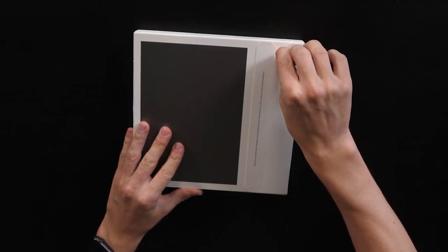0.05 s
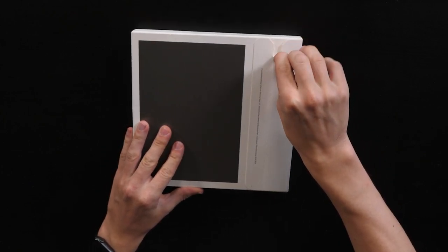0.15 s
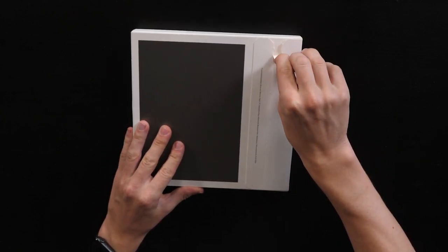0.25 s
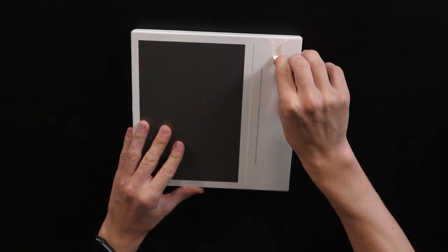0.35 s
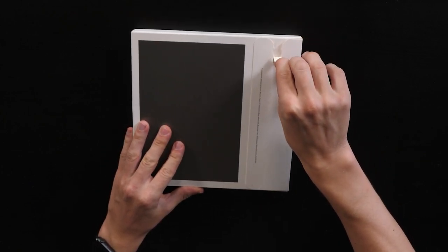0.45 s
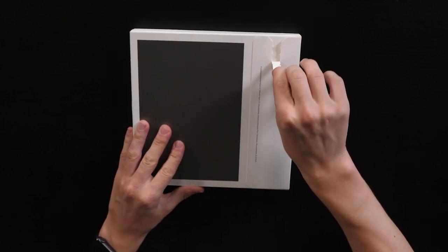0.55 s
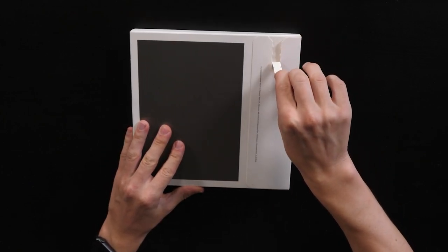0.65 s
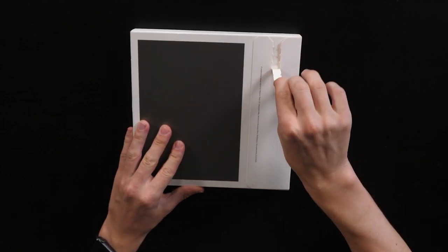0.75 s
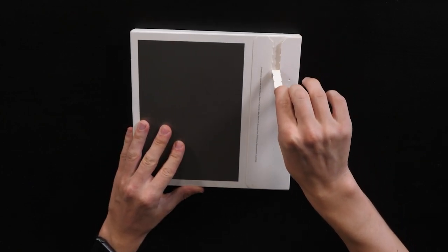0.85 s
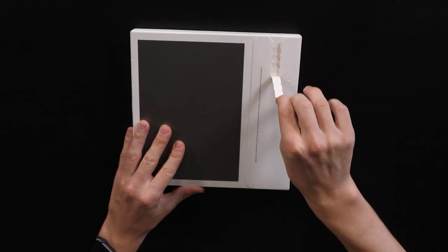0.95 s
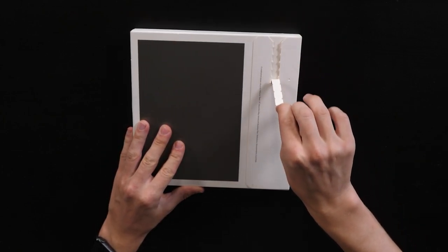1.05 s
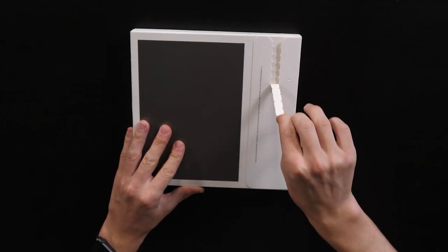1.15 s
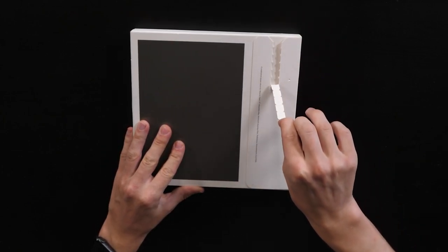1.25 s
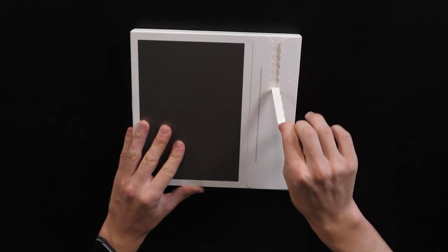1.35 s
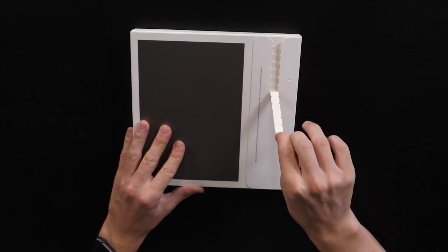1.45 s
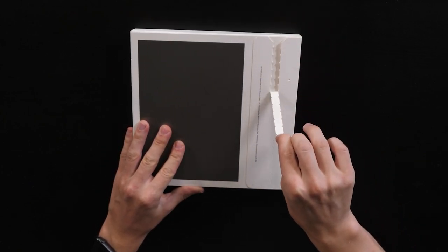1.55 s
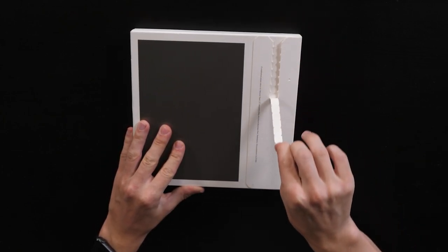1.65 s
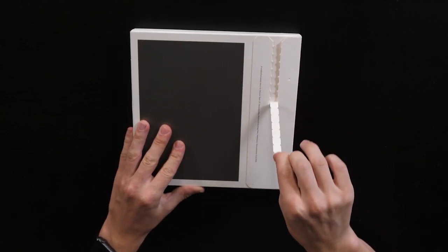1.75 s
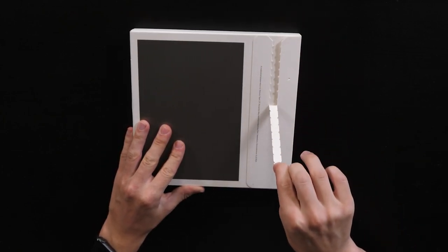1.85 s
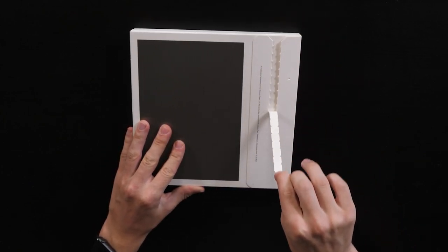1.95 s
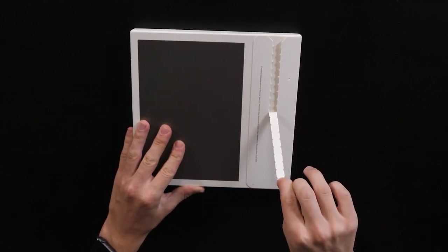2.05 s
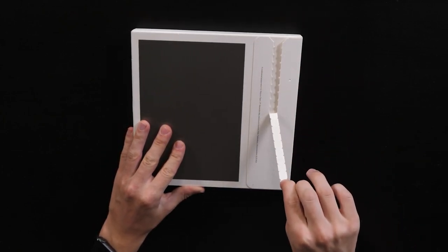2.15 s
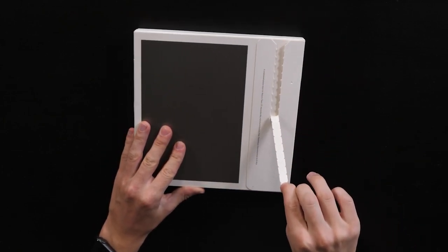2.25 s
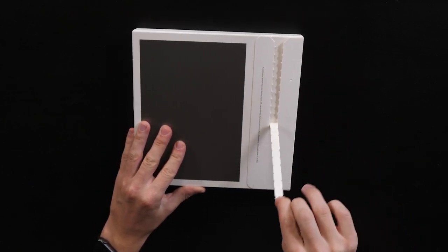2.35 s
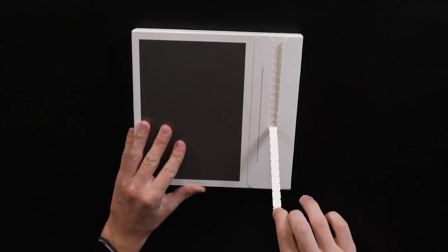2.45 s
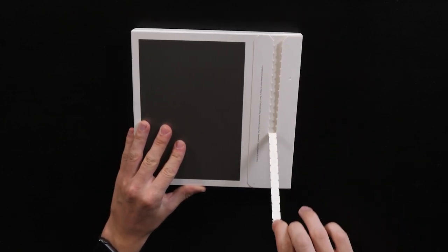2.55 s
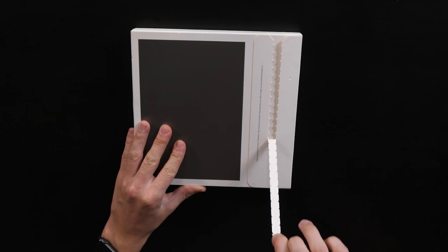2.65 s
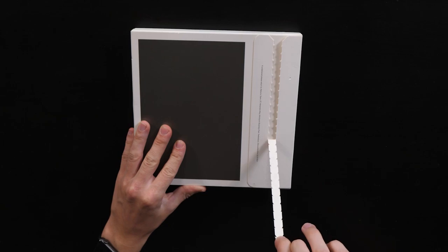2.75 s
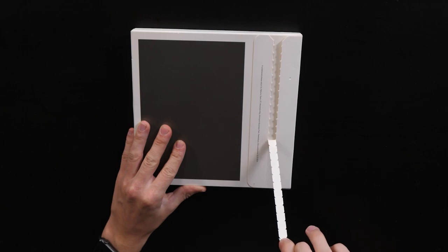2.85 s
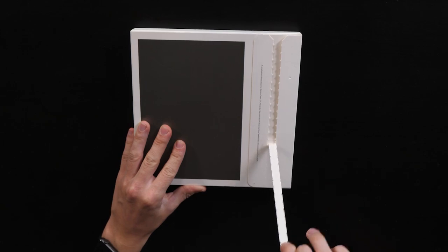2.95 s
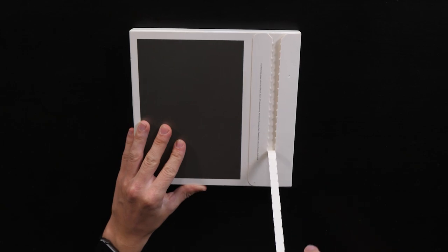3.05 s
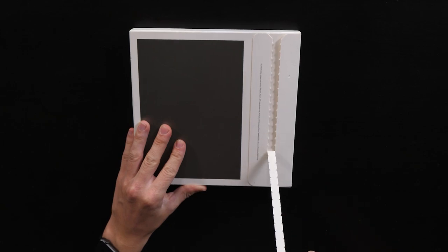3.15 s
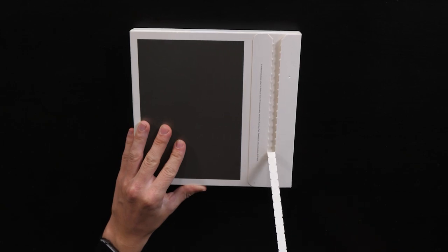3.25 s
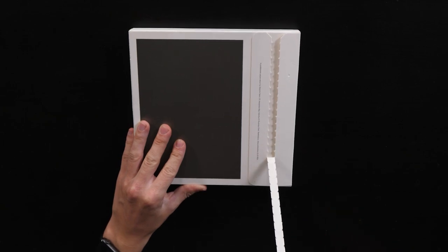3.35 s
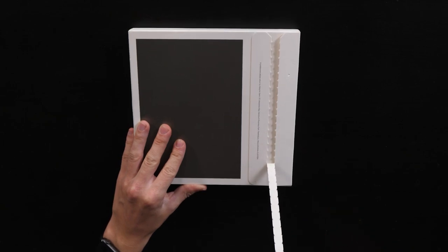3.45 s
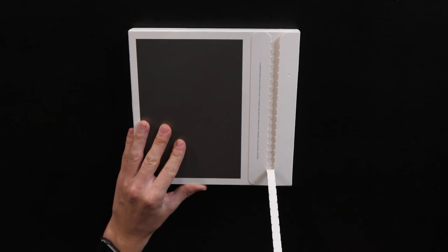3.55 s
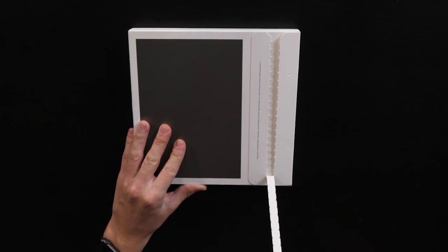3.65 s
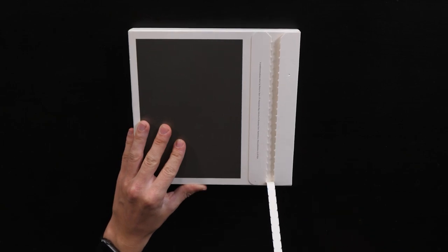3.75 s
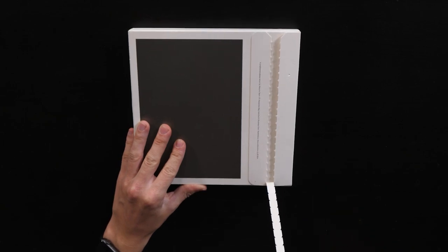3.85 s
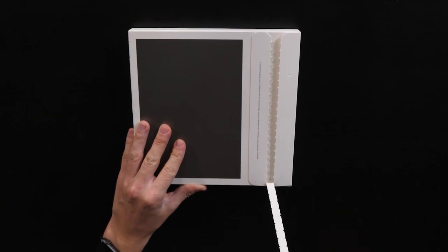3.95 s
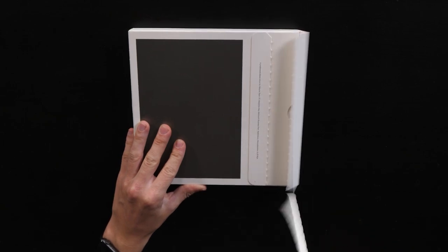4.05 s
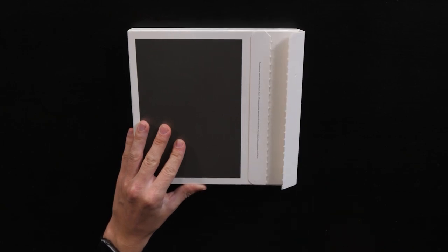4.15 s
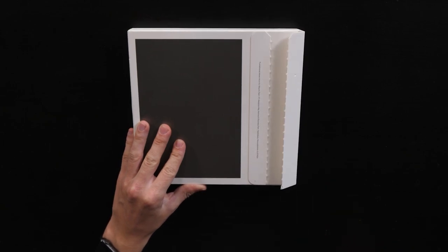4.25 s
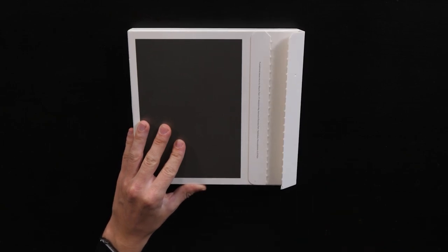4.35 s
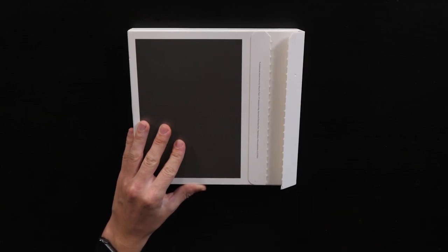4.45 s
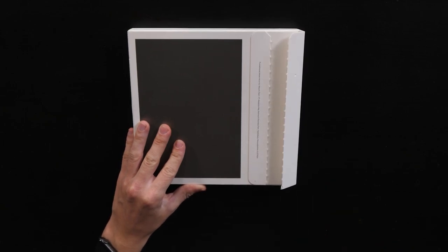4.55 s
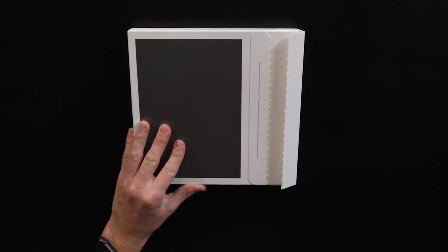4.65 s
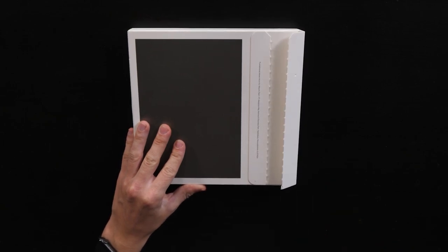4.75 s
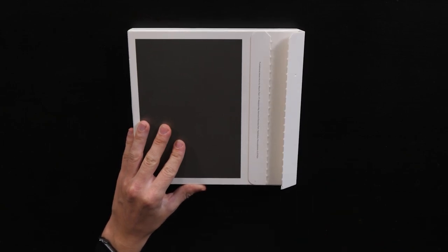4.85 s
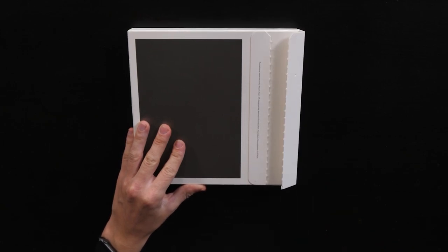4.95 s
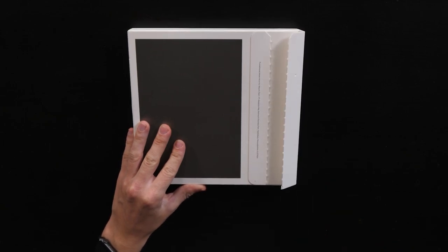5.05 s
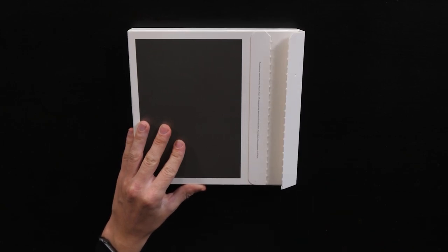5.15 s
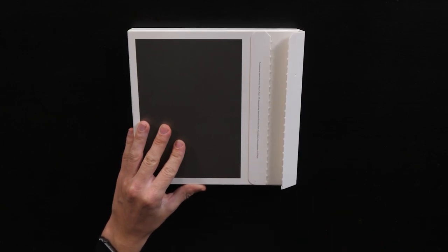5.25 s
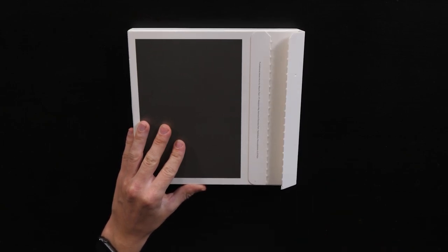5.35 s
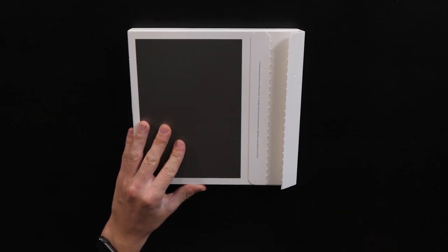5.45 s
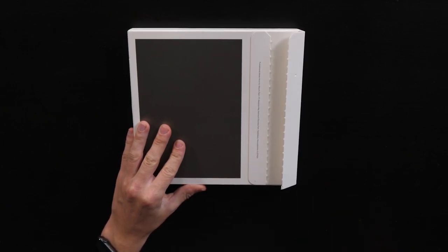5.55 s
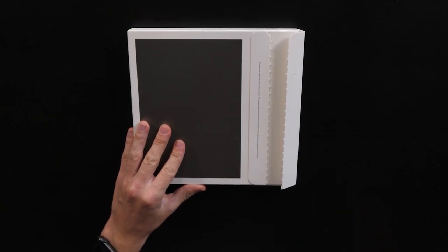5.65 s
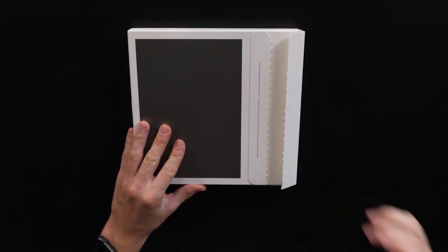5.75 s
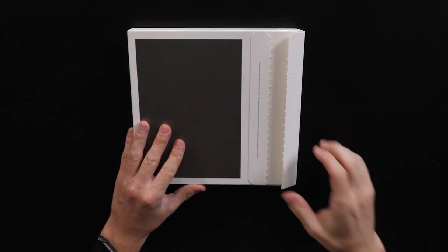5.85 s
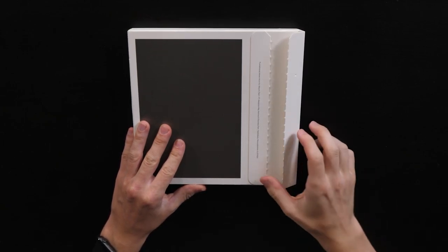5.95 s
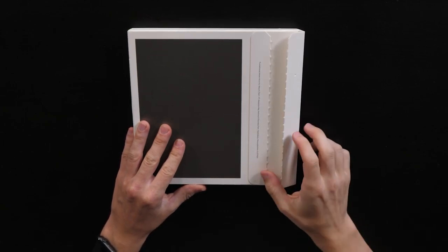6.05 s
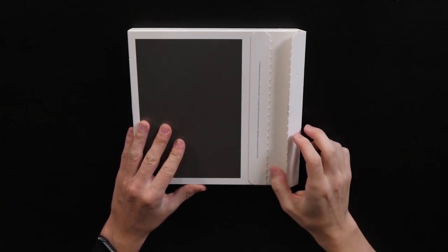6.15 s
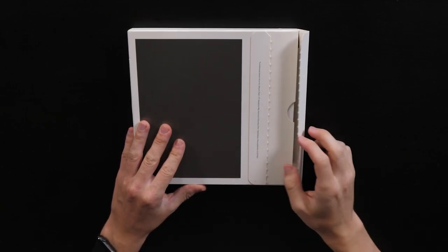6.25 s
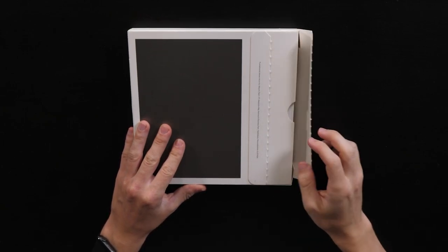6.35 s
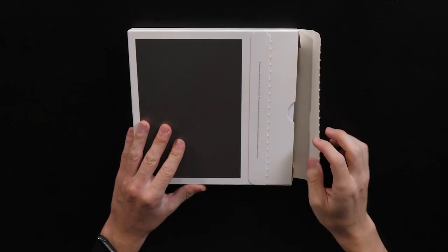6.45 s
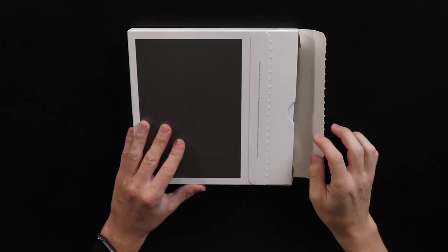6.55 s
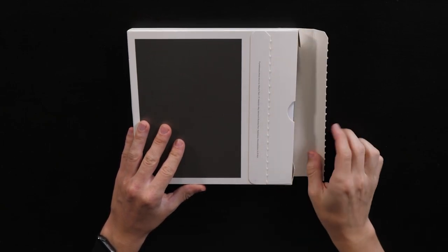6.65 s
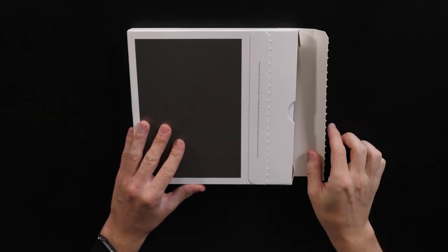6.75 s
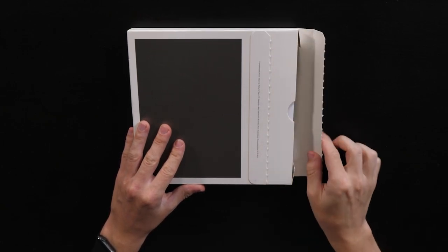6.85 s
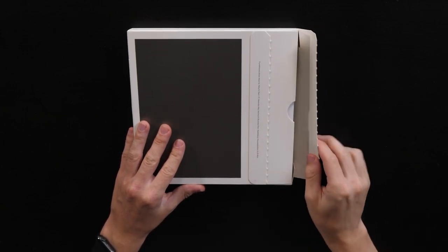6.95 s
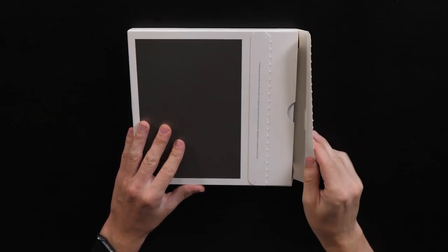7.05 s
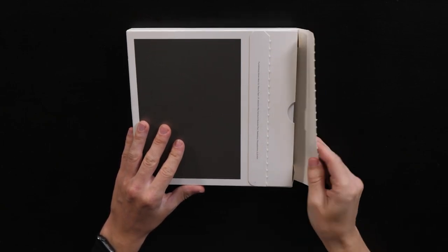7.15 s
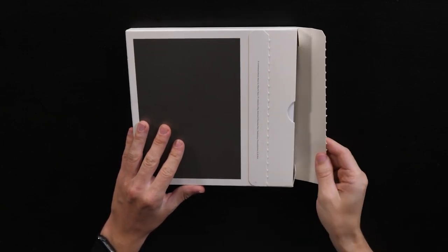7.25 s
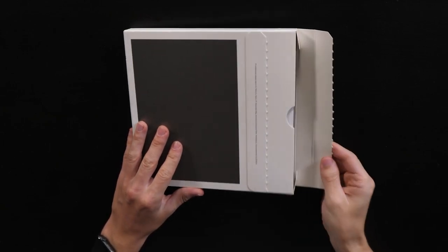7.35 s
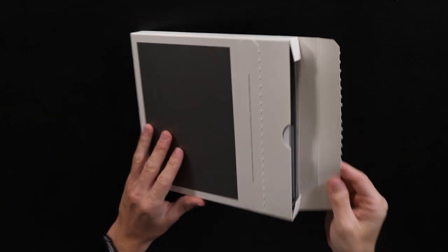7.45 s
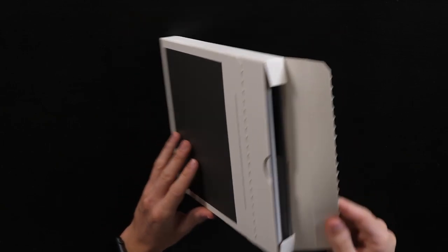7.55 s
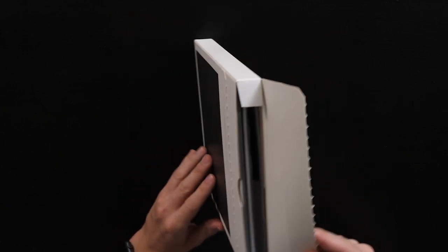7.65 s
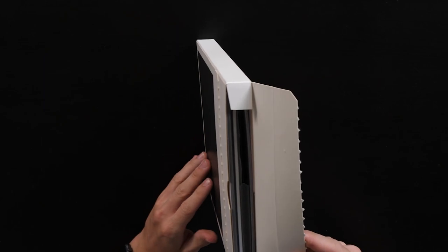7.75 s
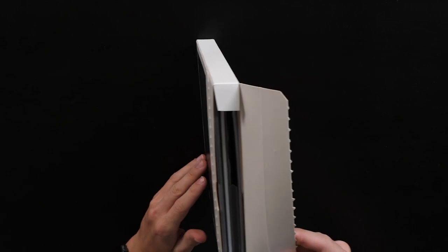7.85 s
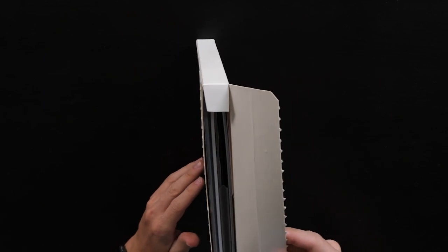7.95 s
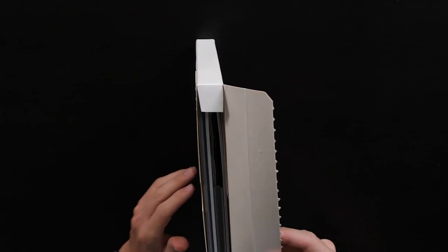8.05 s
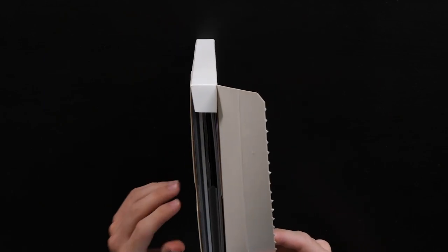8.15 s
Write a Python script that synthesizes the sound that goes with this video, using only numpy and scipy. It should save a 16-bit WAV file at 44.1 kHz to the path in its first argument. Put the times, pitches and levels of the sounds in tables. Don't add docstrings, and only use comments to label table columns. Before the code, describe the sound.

Close-up cardboard tear: dry sharp pops in irregular bursts for four seconds, near silence, then soft taps, rubbing and a brief box scuff.

```python
import sys
import numpy as np
from scipy import signal
from scipy.fft import rfft, irfft
from scipy.io import wavfile
from scipy.ndimage import uniform_filter1d

SR = 44100
rng = np.random.default_rng(int(sys.argv[2]) if len(sys.argv) > 2 else 0)


def wav_out(sig):
    wavfile.write(sys.argv[1], SR, np.round(np.clip(np.atleast_2d(sig).T, -1, 1) * 32767).astype(np.int16))


def invert_db(level):
    return 10 ** (np.asarray(level, dtype=float) / 20)


N = 362061

# (f/Hz, level/dB, undamped time to fall by 60 dB/s
BOX_MODES = [(134.6, -4, 0.36), (305.1, -8.5, 0.2), (446, -9, 0.16), (582.5, -8, 0.064), (883, -3.5, 0.051),
             (1250, -13.5, 0.19), (1350, -15, 0.52)]
# (f/Hz, level/dB)
FIBRE_COLOUR = [(2650, -6), (4500, -3), (5620, 1.5), (8230, 1), (10200, -2.5), (12200, 1.5), (15700, -5),
                (16800, -16.5)]


def unit(x):
    return x / np.sqrt(np.mean(x ** 2))


def along(curve, hz):
    f, value = np.array(curve).T
    return np.interp(np.log(hz), np.log(f), value)


def colour(x, curve):
    size = 4096
    hz = np.arange(1, size // 2 + 2) * SR / size
    cepstrum = irfft(np.log(invert_db(along(curve, hz))))
    cepstrum[1:size // 2] *= 2
    cepstrum[size // 2 + 1:] = 0
    response = irfft(np.exp(rfft(cepstrum)))
    return signal.fftconvolve(x, response / np.linalg.norm(response))[:N]


def ring(x, hz, width_hz):
    b, a = signal.iirpeak(hz, hz / width_hz, SR)
    return signal.lfilter(b, a, x)


def dull(x, hz):
    return signal.sosfilt(signal.butter(4, hz, fs=SR, output="sos"), x)


def walk(rate):
    k = int(SR / rate)
    steps = np.repeat(rng.standard_normal(N // k + 1), k)
    return 0.91 * uniform_filter1d(uniform_filter1d(steps, k), k)[:N]


def grains(rate, spread_db):
    chance = rng.random((3, N))
    happens = chance[0] < rate / SR
    sign = np.sign(chance[1] - 0.5)
    size_db = np.minimum(-spread_db * np.log(chance[2] + 1e-9), 17)
    return unit(happens * sign * invert_db(size_db))


def patchy(x, spread_db, rate):
    centres = 500 * 2 ** np.arange(0, 5, 1 / 3)
    return unit(sum(ring(x * invert_db(spread_db * walk(rate)), hz, hz / 5) for hz in centres))


def strokes(rows, rise_db_s, fall_db_s):
    t = np.arange(0, N + 64, 64) / SR
    start, hold, *columns = np.transpose(rows)[:, :, None]
    rise_db = -rise_db_s * np.maximum(start - t, 0)
    fall_db = -fall_db_s * np.maximum(t - start - hold, 0)
    gains = []
    for db in columns:
        gain = np.sqrt(np.sum(invert_db(db + rise_db + fall_db) ** 2, axis=0))
        gains.append(np.interp(np.arange(N) / SR, t, gain))
    return gains


def air():
    # (f/Hz, level/dB)
    air_colour = [(12, -40), (20, -9), (71, 3.5), (224, -5), (265, -6), (382, -16.5), (709, -18.5),
                  (863, -14), (1240, -19), (1740, -28), (2510, -32.5), (3720, -29.5), (5210, -37),
                  (14700, -38), (16500, -41.5)]
    noise = colour(rng.standard_normal(N), air_colour)
    return invert_db(-55) * noise * invert_db(0.98 * walk(9.2))


def box(push):
    push = np.broadcast_to(push, (len(BOX_MODES), N))
    out = np.zeros(N)
    for k, (hz, db, t60) in enumerate(BOX_MODES):
        out += (-1) ** k * invert_db(db) * ring(push[k], hz, 2.2 / (0.4 * t60))
    return out


def snaps(events, crack_ms, ring_ms, width_hz, push_ms, bright_db, slap):
    crack, flap = np.zeros((2, N + 2048))
    push = np.zeros((len(BOX_MODES), N + 2048))
    lead, length = 768, 2048
    t = (np.arange(length) - lead) / SR * 1000
    before, after = np.minimum(t, 0), np.maximum(t, 0)
    swell = np.exp(before / 0.55) + 0.064 * np.exp(before / 3) * (t < 0)
    fray = swell + 0.14 * np.exp(before / 2.6) * (t < 0)
    crack_fall = np.exp(-after / crack_ms) + 0.0334 * np.exp(-after / 4)
    shove = np.exp(-((t - push_ms) / push_ms) ** 2) / push_ms
    for s, db, crack_db, thump_db, hz in events:
        noise = rng.standard_normal((3, length))
        first = int(s * SR) - lead
        span = slice(first, first + length)

        rush = noise[0] * fray * crack_fall
        crack[span] += invert_db(crack_db) * rush / np.abs(rush).max()

        burst = noise[1] * swell * np.exp(-after / ring_ms)
        tone = ring(burst, hz, width_hz) + 1.8 * ring(burst, hz, width_hz / 2.2)
        tone += 0.6 * ring(burst, 3600 + 300 * noise[2, -1], 480)
        tone += slap * ring(burst, 2000, 4500)
        flap[span] += invert_db(db) * tone / np.abs(tone).max()

        place_db = 3 * noise[2, :len(BOX_MODES), None]
        place_db[0] += -2 * (s < 2.8)
        place_db[0] += 0.5 * (s > 5.0)
        push[:, span] += invert_db(thump_db + place_db) * shove
    cracks = invert_db(bright_db) * colour(crack[:N], FIBRE_COLOUR)
    return cracks + invert_db(4.5) * dull(flap[:N], 4700) + invert_db(15.5) * box(push[:, :N])


def tearing():
    # (t/s, flap level/dB, crack level/dB, box thump/dB, flap ring f/Hz)
    bridges = [(0.1047, -26.5, -30, -42.5, 1700), (0.1831, -13, -28, -24, 2200),
               (0.5584, -26.5, -8.5, -34, 2400), (0.726, -66, -40, -36, 900), (0.7946, -22, -27, -37, 4430),
               (0.9157, -28.5, -33, -36.5, 1530), (1.0858, -29, -30, -37, 2330),
               (1.1318, -20.5, -20, -36, 2110), (1.4343, -21, -14.5, -31, 1150),
               (1.6916, -26.5, -28, -33, 870), (1.8163, -22, -22, -25, 2190),
               (1.9877, -25.5, -26, -36, 2300), (2.3529, -18.5, -16.5, -28, 2100),
               (2.434, -14.5, -19.5, -26, 2070), (2.554, -23, -24, -27, 2280),
               (2.674, -12, -19, -29.5, 1890), (3.033, -10.5, -17, -30, 1840),
               (3.1092, -18.5, -11.5, -29, 2670), (3.3937, -12.5, -16, -24, 2160),
               (3.4736, -13.5, -10, -25, 1890), (3.5813, -15, -14.5, -33.5, 1480),
               (3.6867, -16, -16, -31.5, 2020), (3.7943, -33, -11.5, -29.5, 2540),
               (4.1046, -12, -18.5, -23, 2600)]
    # (t/s, flap level/dB, crack level/dB, flap ring f/Hz)
    other_edge = [(0.1835, -32, -21, 3250), (0.5681, -28.5, -42, 1450), (0.7305, -22.5, -25.5, 2380),
                  (0.7994, -22, -16.5, 2920), (0.9, -30.5, -31, 2150), (0.9204, -27, -27, 1630),
                  (0.984, -27, -24, 880), (0.9887, -20, -26, 700), (1.0896, -27.5, -26.5, 2260),
                  (1.6832, -27, -25, 2193), (1.7035, -29.5, -19.5, 1860), (1.7089, -15, -11, 1740),
                  (1.829, -17.5, -17, 1510), (1.8331, -17, -22, 1500), (1.9741, -23.5, -24, 2530),
                  (2.3573, -14.5, -27, 1375), (2.4442, -15, -19.5, 1510), (2.557, -16, -16.5, 2010),
                  (2.67, -22, -25, 1870), (3.025, -26.5, -28, 1925), (3.0295, -23.5, -30, 1860),
                  (3.1012, -23.5, -22.5, 1990), (3.107, -13.5, -24, 2500), (3.4766, -13.5, -31.5, 1853),
                  (3.5758, -33, -22, 3177), (3.7843, -26, -17, 2720), (3.7897, -19.5, -24, 3200),
                  (4.0664, -30, -33, 2980), (4.0855, -31, -48, 2760), (4.096, -30.5, -34, 3600),
                  (4.149, -16, -40, 1250), (4.1495, -26.5, -27, 3860)]
    # (t/s, crack level/dB, flap ring f/Hz)
    bundles = [(0.0975, -31, 2170), (0.2336, -40, 3010), (0.25, -36, 1980), (0.4342, -38, 1810),
               (0.438, -36, 2780), (0.4474, -36, 930), (0.4711, -30, 955), (0.5443, -29, 2040),
               (0.6562, -32.5, 2580), (0.6723, -36.5, 2610), (0.7424, -37, 1890), (0.8482, -37, 3800),
               (0.9103, -29, 1520), (1.0662, -39.5, 2430), (1.2272, -38.5, 3810), (1.2711, -38, 3400),
               (1.2798, -31.5, 2000), (1.2827, -32, 2820), (1.2955, -29, 2200), (1.3623, -42, 3660),
               (1.405, -41.5, 1270), (1.4437, -53, 1110), (1.9597, -31.5, 2350), (1.9638, -29, 2630),
               (2.4124, -39, 3550), (2.7677, -40.5, 1900), (3.0417, -39.5, 900), (3.1183, -35, 3340),
               (3.5592, -37, 900), (3.5673, -34.5, 1010)]
    # (t/s, crack level/dB)
    strays = [(0.0537, -52), (0.2843, -47), (0.5547, -37), (1.2537, -47), (1.636, -51), (2.0812, -43.5),
              (2.0909, -40), (2.2104, -54), (2.225, -44.5), (2.905, -43), (3.0057, -44), (3.3073, -44.5),
              (3.998, -51)]
    # (t/s, crack level/dB)
    fine_hairs = [(0.087, -57), (.146, -53), (.167, -50), (.33, -59), (0.363, -52), (.367, -56),
                  (.395, -52), (.407, -64), (.4245, -60), (.455, -49), (.628, -46), (.68, -36), (.689, -46),
                  (.697, -44), (.711, -48), (.78, -40), (0.8677, -40), (.9537, -38), (1.233, -43),
                  (1.312, -41), (1.4965, -44), (1.665, -48), (1.899, -47), (1.924, -38), (2.029, -51),
                  (2.1605, -54), (2.3436, -51), (2.513, -44), (2.624, -40), (2.6494, -44), (2.66, -33),
                  (2.7357, -48), (2.871, -60.5), (2.97, -52), (3.208, -51), (3.274, -58.5), (3.3315, -43),
                  (3.3717, -44), (3.441, -48), (3.746, -54), (4.011, -49.5), (4.029, -52.5), (4.055, -40),
                  (2.333, -53), (2.753, -46), (2.992, -49.5), (.613, -45.5), (.815, -42), (0.886, -44.5),
                  (1.055, -45), (1.18, -48.5), (1.214, -45.5), (1.54, -48), (1.649, -51.5)]
    events = [*bridges]
    events += [(s, db, crack_db, db - 21.5, hz) for s, db, crack_db, hz in other_edge]
    fibres = [*bundles] + [(s, db, 2200) for s, db in strays]
    events += [(s, db - 5.5, db, db - 13, hz) for s, db, hz in fibres]
    events += [(s, db - 12, db, db - 25, 3600) for s, db in fine_hairs]
    return snaps(events, crack_ms=0.38, ring_ms=2.1, width_hz=510, push_ms=0.47, bright_db=3.4, slap=0.61)


def peeling():
    # (start t/s, hold/s, level/dB, fine fibre level/dB)
    tugs = [(.1, 0.025, -55, -63.5), (.185, 0.027, -42, -52), (.435, 0.02, -51, -57.5),
            (.55, 0.06, -44, -52), (.74, 0.098, -47, -57), (.84, 0.17, -48, -53), (1.08, 0.079, -47, -56.5),
            (1.25, 0.032, -47, -51), (1.41, 0.021, -52, -55), (1.45, 0.062, -51, -56),
            (1.69, 0.14, -45.5, -52.5), (1.86, 0.046, -45.5, -57.5), (1.94, 0.059, -43.5, -54),
            (2.1, 0.16, -64.5, -72), (2.25, 0.068, -53, -77), (2.37, 0.11, -46.5, -56),
            (2.5, 0.11, -47.5, -57.5), (2.645, 0.066, -41, -54.5), (2.87, 0.18, -64, -73),
            (3.05, 0.09, -40.5, -52), (3.2, 0.21, -58.5, -68), (3.41, 0.11, -42, -52),
            (3.53, 0.3, -46, -54.5), (4.09, 0.012, -39, -41)]
    # (f/Hz, level/dB)
    strip_colour = [(290, -35), (500, -18), (566, -0.5), (758, -8), (1050, -3), (3350, -6), (3760, -4.5),
                    (6000, -21.5), (7800, -26.5), (13200, -120)]
    body, fine = strokes(tugs, rise_db_s=603.5, fall_db_s=184)
    flurry = walk(70)
    patter = invert_db(3.0 * flurry) * (grains(2000, 1.7) + 0.32 * rng.standard_normal(N))
    tick_gain = invert_db(3.3 * flurry + 5.3 * walk(250))
    ticks = tick_gain * (grains(1200, 3) + 0.28 * rng.standard_normal(N))
    layers = colour(patchy(patter, 4.1, 25), strip_colour)
    dust = colour(patchy(ticks, 5.5, 40), FIBRE_COLOUR)
    return invert_db(-5.5) * body * layers + invert_db(-2.0) * fine * dust


def shudders():
    # (t/s, level/dB, f/Hz, time to fall by 60 dB/s)
    shudder_events = [(.186, -40, 600, 0.17), (0.803, -41, 4000, .12), (.99, -44.5, 2100, .15),
                      (1.133, -45, 1850, 0.25), (1.437, -39, 1050, 0.18), (1.69, -40.5, 693, .1),
                      (1.722, -40.5, 1700, .25), (1.834, -38, 735, 0.086), (2.36, -38.5, 1490, 0.13),
                      (2.446, -40, 1800, 0.26), (2.56, -43.5, 600, 0.068), (2.675, -38, 1860, 0.074),
                      (2.679, -45, 3900, 0.1), (3.035, -41.5, 1940, .12), (3.396, -38, 640, 0.061),
                      (3.478, -36, 850, 0.098), (3.585, -43.5, 710, 0.083), (4.107, -34, 960, 0.13),
                      (4.152, -35.5, 970, 0.22)]
    sharpness = 4.1
    out = np.zeros(N)
    t = np.arange(SR // 4) / SR
    for s, db, hz, t60 in shudder_events:
        envelope = np.exp(-np.log(1000) * t / t60) * (1 - np.exp(-t / 0.002))
        rough = rng.standard_normal(len(t)) * envelope
        band = ring(ring(rough, hz, hz / sharpness), hz, 2 * hz / sharpness)
        first = int(s * SR)
        out[first:first + len(t)] += 2.3 * invert_db(db) * band / np.abs(band).max()
    return out


def table():
    # (t/s, level/dB)
    jolts = [
        (0.19, -29),
        (.25, -35),
        (0.567, -32),
        (.81, -41),
        (2.359, -49.5),
        (4.11, -37),
        (4.149, -28),
        (7.548, -45),
        (7.68, -40),
        (7.858, -46),
    ]
    push = np.zeros(N)
    for s, db in jolts:
        push[int(s * SR)] = invert_db(db)
    return invert_db(56) * ring(ring(push, 48, 14.0), 81, 37)


def lid():
    # (t/s, peak level/dB)
    booms = [
        (1.435, -42),
        (1.713, -42.5),
        (2.359, -40.5),
        (2.448, -38),
        (2.559, -39),
        (3.687, -38),
        (6.84, -42),
    ]
    push = np.zeros(N)
    for s, db in booms:
        push[int(s * SR)] = invert_db(db)
    return invert_db(54.5) * ring(ring(push, 116.4, 22), 116.4, 90)


def freed_flap():
    # (f/Hz, level/dB)
    freed_colour = [(290, -25.5), (500, -13.5), (859, -18.5), (1020, 2), (1210, -10.5), (1580, -4.5),
                    (2500, -28.5), (3300, -13.5), (4500, -13), (5490, -42), (7000, -37), (9100, -48),
                    (15400, -120)]
    freed_s, t60_s = 4.152, 0.2
    t = np.arange(N) / SR - freed_s
    fall = np.log(1000) * np.maximum(t, 0) / t60_s
    flutter = invert_db(-25) * np.exp(-fall / 7.4)
    shudder = np.exp(np.minimum(t, 0) / 0.022) * (np.exp(-fall) + flutter)
    rough = shudder * invert_db(3.5 * walk(60)) * rng.standard_normal(N)
    return invert_db(-32) * colour(rough, freed_colour)


def rubbing():
    # (start t/s, hold/s, level/dB, hiss level/dB, pressure on the box/dB)
    rubs = [(4.58, 1.4, -91.5, -97.5, -73.5), (4.61, 0.023, -71.5, -80, -74),
            (4.78, 0.048, -65, -79.5, -80.5), (4.88, 0.033, -78.5, -78, -78),
            (5.35, 0.066, -64.5, -80.5, -86), (5.997, 0.013, -46.5, -70, -46),
            (6.03, 0.15, -56, -72.5, -50.5), (6.25, 0.93, -60, -72.5, -61.5), (6.45, 0.13, -59, -70, -61),
            (6.675, .012, -60, -69, -51), (6.69, 0.03, -47, -60.5, -50.5), (6.755, .015, -50.5, -78, -50),
            (6.81, 0.05, -48.5, -81, -48), (6.938, 0.0098, -50, -59, -53), (6.952, 0.021, -42, -64, -46),
            (6.985, 0.027, -48, -67, -62), (7.02, 0.089, -51.5, -69, -52), (7.14, 0.055, -47.5, -62, -50.5),
            (7.21, 0.039, -47, -58.5, -48), (7.35, 0.12, -58, -80, -58), (7.275, .01, -61, -65, -48),
            (7.292, 0.0054, -45.5, -71, -56), (7.458, .025, -49, -67, -57), (7.49, 0.11, -42, -53.5, -49.5),
            (7.595, 0.061, -36.5, -51.5, -48), (7.655, 0.037, -33.5, -47, -37.5),
            (7.7, 0.044, -37, -46, -42.5), (7.79, 0.091, -61, -76, -63), (7.9, 0.22, -65.5, -84, -65)]
    # (start t/s, hold/s, share/dB)
    squeals = [
        (6.0, 0.98, -26),
        (6.94, 0.033, 1),
    ]
    # (start t/s, hold/s, level/dB)
    drags = [
        (7.46, .1, -63),
        (7.58, 0.048, -48),
        (7.635, 0.063, -40.5),
        (7.715, .025, -50),
    ]
    # (f/Hz, width/Hz, level/dB)
    flap_tones = [(1174, 30, 4), (1700, 73, -2), (2200, 490, -13), (3210, 100, 3)]
    # (f/Hz, level/dB)
    finger_colour = [(470, -32), (800, -3.5), (1090, 5.5), (1310, 1.5), (1670, 0), (2000, -6), (3270, -4),
                     (7000, -34), (9100, -53), (15400, -120)]
    # (f/Hz, level/dB)
    slide_colour = [(470, -18.5), (800, -2.5), (945, -39), (1060, 2.5), (1690, -1), (2980, -2), (3490, 0),
                    (4120, -5), (4870, -19), (6500, -25), (8450, -33), (14300, -120)]
    rates = dict(rise_db_s=650, fall_db_s=398)
    body, hiss, pressure = strokes(rubs, **rates)
    (squeal,) = strokes(squeals, **rates)
    (edge,) = strokes(drags, **rates)

    sliding = np.arange(N) / SR > 7.42
    unevenness = invert_db(np.where(sliding, 2.1, 3.3) * walk(50))
    slip = unevenness * (grains(4500, 2.7) + 0.47 * rng.standard_normal(N))

    flap = sum(invert_db(db) * ring(slip * invert_db(2.0 * walk(11)), hz, width) for hz, width, db in flap_tones)
    by_finger = invert_db(-1.5) * colour(patchy(slip, 3.6, 35), finger_colour)
    panel = np.where(sliding, unit(colour(slip, slide_colour)), by_finger)
    panel = panel + squeal * unit(dull(flap, 3560))

    whistle = edge * unit(ring(ring(slip, 4020, 790), 4020, 1580))
    rumble = unit(ring(box(slip), 240, 240))
    dust_colour = [(3000, -12.5), (5000, -1), (9000, -5.0), (15000, -7), (16500, -10)]  # (f/Hz, level/dB)
    dust = unit(colour(patchy(slip, 5, 14), dust_colour))
    return invert_db(-2.5) * body * panel + invert_db(-1.5) * hiss * dust + invert_db(-3.0) * pressure * rumble + whistle


def tapping():
    # (t/s, peak level/dB, crack level/dB, box thump/dB, flap ring f/Hz)
    taps = [(4.62, -56, -70, -70, 3990), (4.795, -57, -60, -52, 3020), (4.9, -56, -78, -76, 4430),
            (5.6237, -55, -63, -69, 1030), (5.9888, -39, -54, -26.5, 3340), (6.0004, -38, -46, -29, 3200),
            (6.059, -60, -58, -53, 840), (6.2025, -48, -62, -62, 3300), (6.2156, -48, -64, -65, 3500),
            (6.265, -56.5, -61, -68, 3600), (6.5318, -45, -64, -56, 1060), (6.8035, -50, -65, -53, 1100),
            (6.844, -55, -65, -39, 1500), (7.138, -48, -67, -63, 2480), (7.2945, -40, -65, -43, 1280),
            (7.2985, -39, -70, -54, 1400), (7.2995, -41, -66, -57, 2400), (7.3442, -44, -57, -61, 2950),
            (7.3664, -47, -62, -68, 2800), (7.3787, -53, -64, -64, 3300), (7.387, -52, -66, -66, 3000),
            (7.4882, -35.5, -65, -41, 1500), (7.596, -28.5, -62, -37.5, 900), (7.8555, -36, -45, -59, 3260),
            (7.9211, -41.5, -60.5, -58, 3150)]
    return snaps(taps, crack_ms=0.57, ring_ms=1.47, width_hz=860, push_ms=0.68, bright_db=3.5, slap=0.24)


def room(x):
    # (f/Hz, time to fall by 60 dB/s)
    tail_t60 = [(100, 0.33), (300, 0.27), (1000, 0.2), (3000, 0.12), (8000, 0.082), (15000, 0.036)]
    # (f/Hz, level/dB)
    tail_db = [(100, -2.5), (300, -3.5), (1000, -9.5), (2000, -11), (2800, -21.5), (4100, -8),
               (5300, -12.5), (8000, -12.5), (15000, -19.5)]
    t = np.arange(SR // 2) / SR
    tail = np.zeros(len(t))
    for hz in 70 * 2 ** np.arange(0, 8, 1 / 3):
        decay = np.exp(-np.log(1000) * t / along(tail_t60, hz)) * (1 - np.exp(-t / 0.0056))
        band = ring(ring(rng.standard_normal(len(t)), hz, hz / 3), hz, hz / 3)
        tail += invert_db(along(tail_db, hz)) * band * decay / np.linalg.norm(decay)
    return signal.fftconvolve(x, tail)[:N]


def scene():
    card = tearing() + peeling() + shudders() + freed_flap() + rubbing() + tapping()
    return (air() + card + room(card) + table() + lid())[None]


def roll_off(x):
    return signal.sosfilt(signal.butter(12, 17120, fs=SR, output="sos"), x)


def record(dry):
    wide = signal.sosfilt(signal.ellip(8, 0.2, 70, 16550, fs=SR, output="sos"), dry)
    return roll_off(wide)


dry = scene()
out = record(dry)
wav_out(out)
```